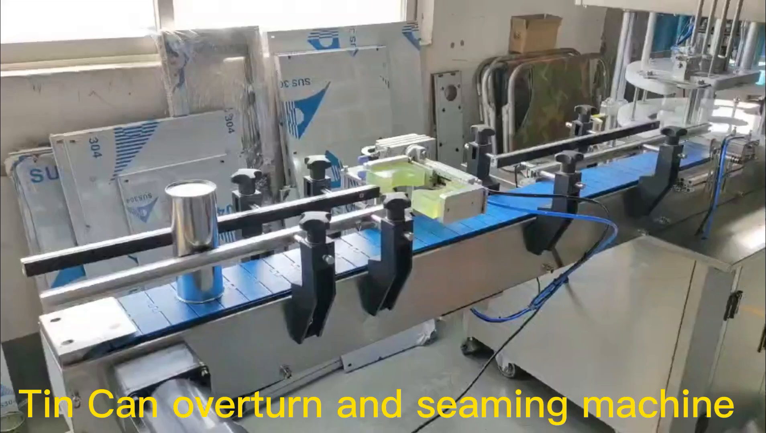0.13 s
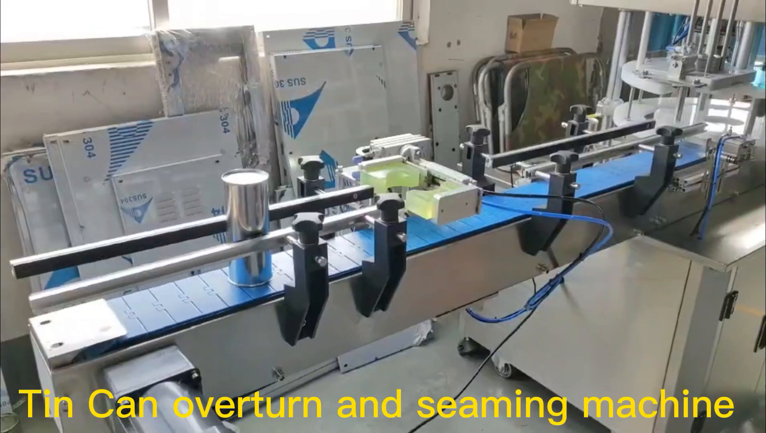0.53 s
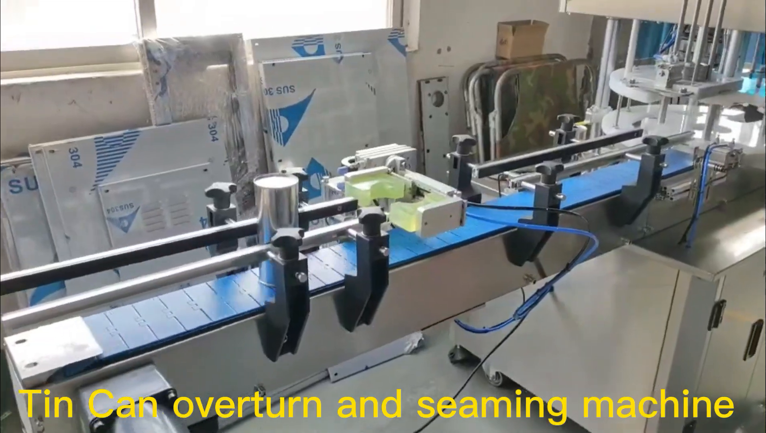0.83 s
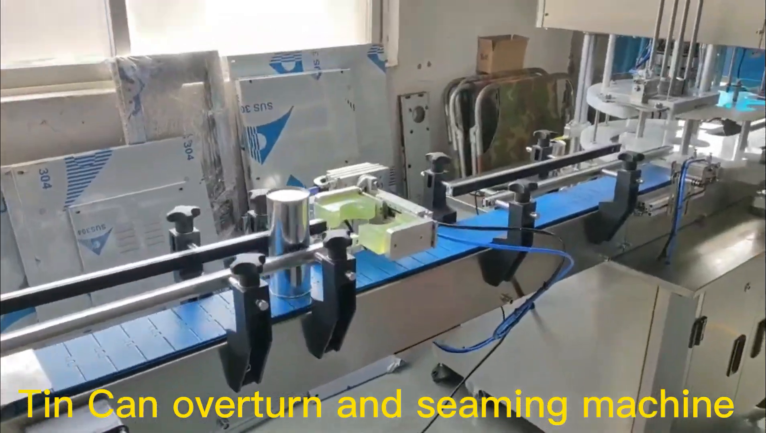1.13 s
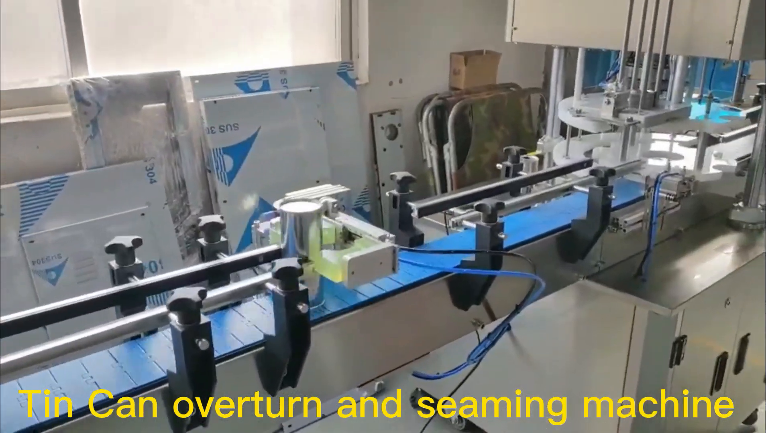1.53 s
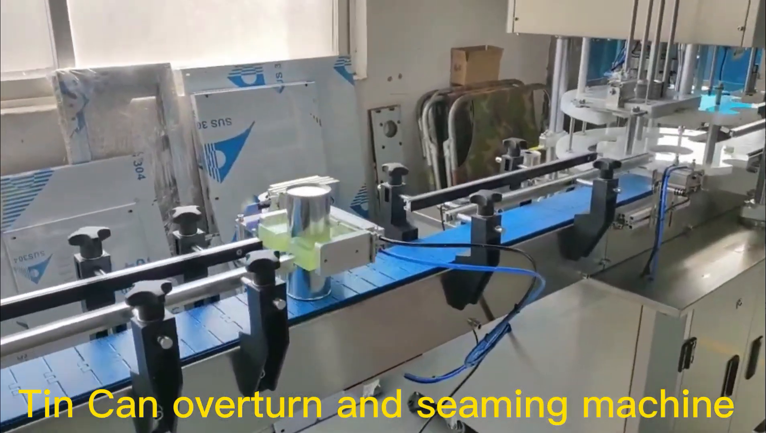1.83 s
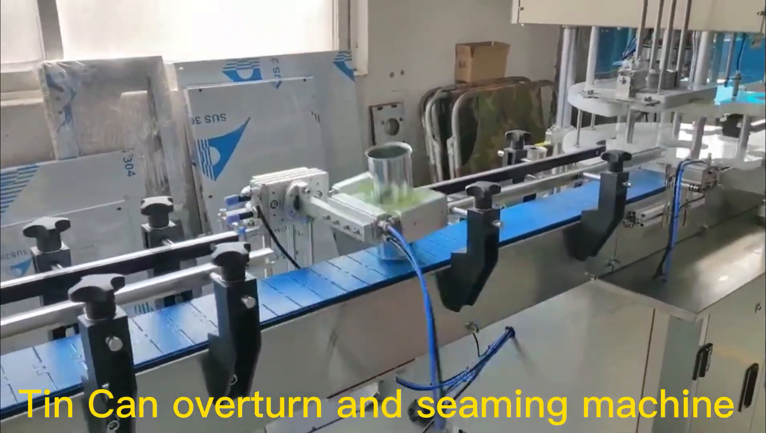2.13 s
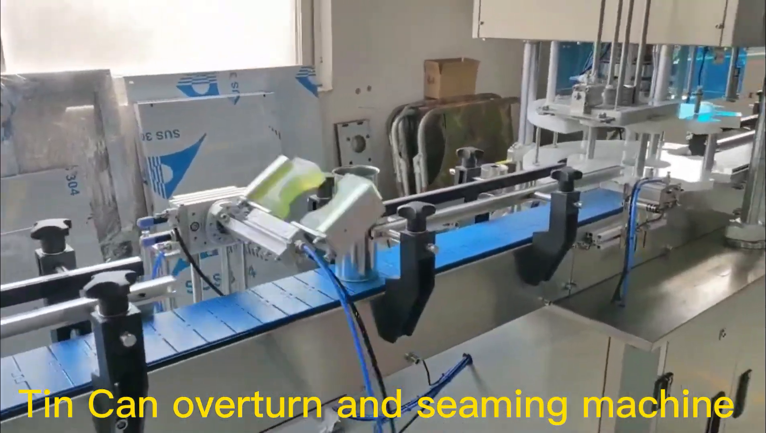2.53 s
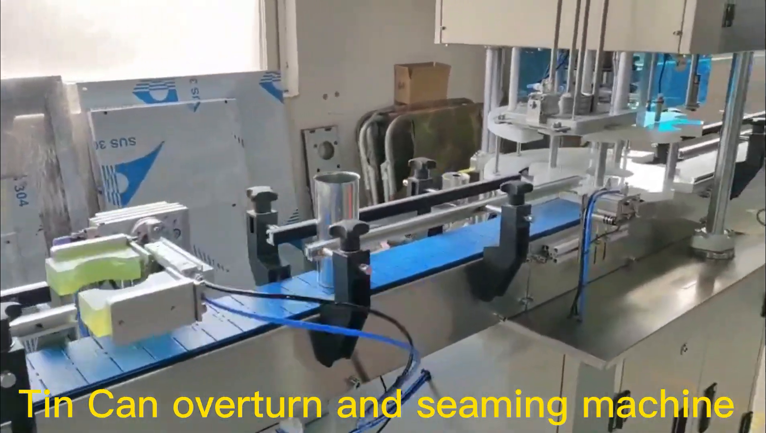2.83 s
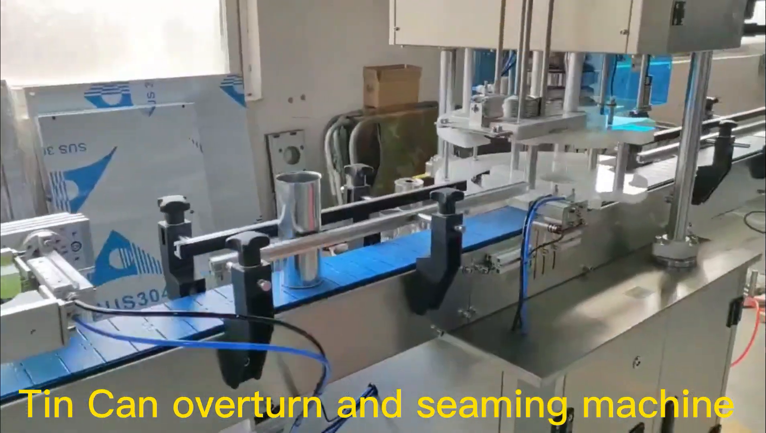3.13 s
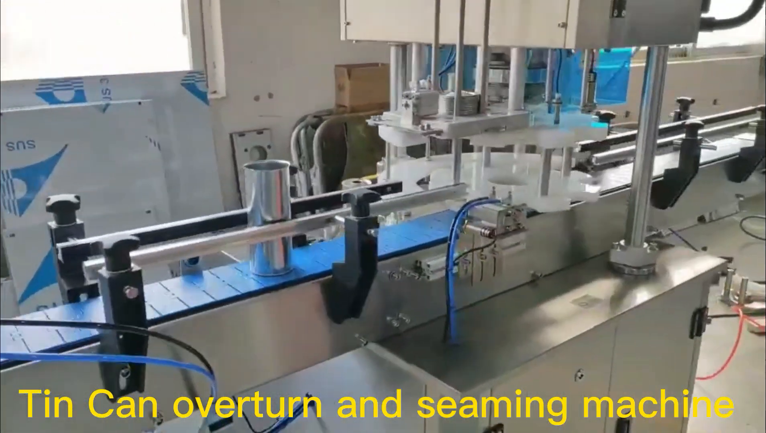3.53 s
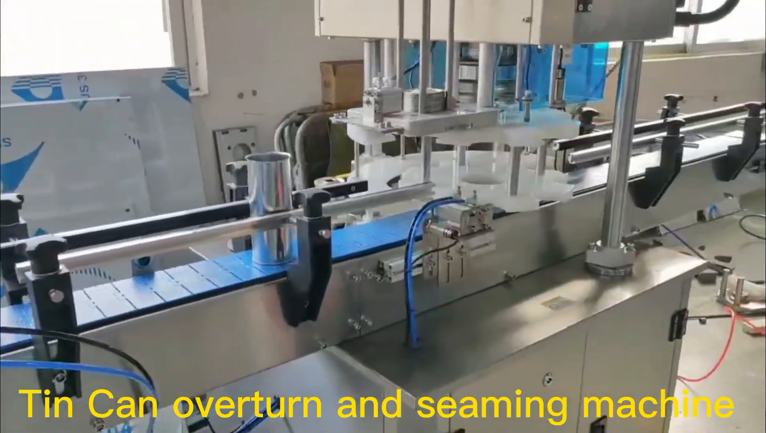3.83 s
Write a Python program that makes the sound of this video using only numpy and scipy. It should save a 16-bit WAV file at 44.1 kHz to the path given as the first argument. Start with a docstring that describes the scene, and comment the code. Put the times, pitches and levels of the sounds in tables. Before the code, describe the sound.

A conveyor whirs and drones in a workshop, with a thin electric whine and light knocks. Midway, a sliding tin can moans briefly, then an air-powered clamp clatters and gives four short hisses as the belt keeps running.

```python
"""First you hear a slat conveyor whirring and droning in a workshop as its slats slide and knock.
A thin electric whine from its drive joins in, with a few dry ticks and dull knocks of the belt.
A low moan rises as a tin can slides into an air-powered clamp. The clamp grips the can, turns it
over, lets go and swings back: its stops clatter and its valves give four short hisses of air."""
import sys
import numpy as np
from scipy import signal
from scipy.fft import rfft, irfft
from scipy.io import wavfile
from scipy.ndimage import uniform_filter1d

SR = 44100
rng = np.random.default_rng(int(sys.argv[2]) if len(sys.argv) > 2 else 0)


def store_pcm(level_fs):
    """Save levels as 16-bit WAV."""
    pcm = np.round(np.clip(level_fs, -1, 1) * 32767).astype(np.int16)
    wavfile.write(sys.argv[1], SR, np.atleast_2d(pcm).T)


N = 176400
T = np.arange(N) / SR
HZ = np.fft.rfftfreq(N, 1 / SR)


def amp(db):
    """Turns decibels into a number to multiply by."""
    return 10 ** (np.asarray(db) / 20)


def unit(x):
    """Scales a signal so its average strength (rms) is 1."""
    return x / np.sqrt(np.mean(x ** 2) + 1e-20)


def curve(rows, column=1):
    """One column of a table, joined by straight lines in time."""
    rows = np.array(rows)
    return np.interp(T, rows[:, 0], rows[:, column])


def colour(points):
    """How strong each pitch is, from rows of pitch_hz, level_db."""
    hz, db = np.transpose(points)
    return amp(np.interp(np.log(HZ + 1), np.log(hz), db))


def noise(gain):
    """Noise of strength 1 with the given colour."""
    return unit(irfft(rfft(rng.standard_normal(N)) * gain, N))


def wander(rate_hz):
    """A smooth random wobble of strength 1."""
    return noise(np.exp(-(HZ / rate_hz) ** 2))


def ripple(bins):
    """Random peaks and dips from low pitch to high; more bins make them wider."""
    return unit(uniform_filter1d(rng.standard_normal(len(HZ)), size=bins))


def phase_of(pitch_hz):
    """The angle a wave has turned through as its pitch changes."""
    return 2 * np.pi * np.cumsum(pitch_hz) / SR


# Colour of the whir, before each band gets its level: pitch_hz, level_db
WHIR_COLOUR = [(25, -46), (65, -19.5), (110, -14), (150, -2), (190, 4.5), (290, 5), (350, -9), (460, -4),
               (620, -6), (750, -9.5), (900, -6.5), (1080, -9.5), (1400, -8.5), (1650, -7.5), (2300, -6.5),
               (3000, -11), (3700, -14.5), (4600, -21), (5600, -17.5), (6500, -20.5), (7000, -24),
               (8600, -37.5), (10000, -34), (10900, -41), (11600, -26), (12000, -46)]
# Where the four bands meet: pitch_hz
BAND_EDGES = [364, 1090, 3750]
# Loudness of the bands: time_s, bass_db, body_db, rasp_db, treble_db
BAND_LEVELS = [(.14, -45.5, -50, -60, -64.5), (.32, -49.5, -49, -54.5, -61.5), (.55, -48, -41.5, -42, -53),
               (1.05, -44, -42.5, -42, -52), (1.5, -39.5, -41, -40, -46.5), (2.2, -38.5, -40.5, -40.5, -48),
               (2.75, -47, -38, -40, -46.5), (3.15, -48, -40, -41.5, -50), (3.5, -43, -39, -41, -49),
               (4, -54, -36.5, -38.5, -46.5)]

def conveyor(knocks_per_s=500, spread_db=2.5, knock_share=0.22):
    """Slats slide and knock along their guides, and the frame colours the sound."""
    hits = (rng.random(N) < knocks_per_s / SR) * rng.choice([-1, 1], N)
    hits = hits * amp(spread_db * np.minimum(rng.exponential(1, N), 4))
    t = T[:SR // 20]
    knock = rng.standard_normal(len(t)) * amp(-60 * t / 0.037)
    rattle = unit(signal.fftconvolve(hits, knock)[:N])
    slats = np.sqrt(knock_share) * rattle + np.sqrt(1 - knock_share) * rng.standard_normal(N)
    # Small patches of pitch swell and fade, and the level flickers.
    grid = signal.stft(slats, nperseg=512)[2]
    patches = uniform_filter1d(rng.standard_normal(grid.shape), size=7, axis=0)
    patches = unit(uniform_filter1d(patches, size=8, axis=1))
    slats = signal.istft(grid * amp(1.71 * patches), nperseg=512)[1][:N]
    slats = slats * amp(0.28 * wander(51))
    # A fine random ripple makes the whir's colour slightly uneven.
    ripple_db = 1.9 * ripple(bins=100) * np.minimum(HZ / 800, 1)
    rest, out = rfft(slats) * colour(WHIR_COLOUR) * amp(ripple_db), 0
    for column, edge_hz in enumerate(BAND_EDGES + [SR], start=1):
        band = rest / (1 + (HZ / edge_hz) ** 8)
        rest = rest - band
        out = out + unit(irfft(band, N)) * amp(curve(BAND_LEVELS, column))
    return out


# Low notes of the frame: pitch_hz, width_hz, level_db
DRONE_NOTES = [(188.7, 14.8, -42), (235.1, 14.6, -41.5), (319, 44, -47.5), (391, 19.5, -50),
               (437, 7.8, -52.5), (459.6, 15, -54)]
# Swell added to all those notes: time_s, boost_db
DRONE_SWELL = [(.14, -12.5), (1.1, -10), (1.75, -3), (2.0, 2.5), (2.5, 3), (2.95, 5), (3.4, 1.5), (4, 5.5)]

def drone():
    """The belt keeps the frame's low notes ringing."""
    out = 0
    for hz, width_hz, db in DRONE_NOTES:
        ring = signal.hilbert(noise(1 / (1 + ((HZ - hz) / width_hz) ** 2)))
        evened = ring.real / np.sqrt(abs(ring) + 0.84)  # softens the loudest moments
        out = out + amp(db) * unit(evened)
    return out * amp(curve(DRONE_SWELL))


# Loudness of the gear motor: time_s, level_db
MOTOR_LEVEL = [(.14, -73), (1.2, -51), (1.8, -44), (2.0, -33.5), (2.2, -41), (2.6, -50), (3.25, -36),
               (3.5, -43), (3.8, -34), (4, -48)]

def motor_hum(pitch_hz=186, waver=0.013, throbs_per_s=5.35, depth=0.28, crest_s=3.7):
    """The motor's low tone throbs as the slats pass the toothed wheel."""
    phase = phase_of(pitch_hz * (1 + waver * wander(10.8)))
    throb = 1 + depth * np.cos(2 * np.pi * throbs_per_s * (T - crest_s))
    return amp(curve(MOTOR_LEVEL)) * unit(throb * np.sin(phase))


# Two faint airy whistles, one rising and one sinking: time_s, pitch_hz, level_db
WHISTLE_UP = [(.14, 9700, -95), (.235, 9900, -77), (.258, 10500, -66), (.3, 11700, -71), (.42, 12030, -64),
              (.8, 12300, -65), (1.0, 12010, -86)]
WHISTLE_DOWN = [(.4, 8200, -85), (1.2, 7950, -74), (1.9, 7680, -64), (2.5, 7560, -71), (4, 7510, -70)]

def whistle(path, width_hz):
    """A narrow band of hiss slides in pitch and loudness."""
    phase = phase_of(curve(path))
    hiss = wander(width_hz) * np.cos(phase) + wander(width_hz) * np.sin(phase)
    return amp(curve(path, column=2)) * hiss


# Dry ticks: time_s, peak_db
TICK_TIMES = [(.245, -32), (1.6565, -13.5), (1.7893, -15.5), (2.143, -18.5), (2.3444, -12), (3.827, -23.5)]
# Colour of one tick: pitch_hz, level_db
TICK_COLOUR = [(1200, -34), (2000, -4), (3100, 2.5), (4000, -1.5), (5200, -7), (6500, -9), (7500, -24),
               (12000, -40)]

def ticks():
    """Dry clicks, each about two waves long."""
    click = irfft(colour(TICK_COLOUR), N)
    return sum(-amp(db) * np.roll(click / click[0], round(s * SR)) for s, db in TICK_TIMES)


# Drive tones, beside the clamp and further down the line: pitch_hz, near_db, far_db
WHINE_TONES = [(5518, -66, -66), (5660, -60, -64.5), (5730, -60, -65.5), (5970, -66, -67), (6110, -70, -68),
               (6277, -63, -64), (6312, -76, -66), (6347, -69, -61.5), (6385, -69, -65), (6490, -55.5, -58),
               (6560, -58, -58.5), (6662, -65, -67), (8092, -75, -73)]
# Swell added to all those tones: time_s, boost_db
WHINE_SWELL = [(.25, -24), (.55, -0.5), (1.2, 0), (1.7, 6.5), (2.3, 5.5), (3.1, 5), (4, -3.5)]

def drive_whine(walk_start_s=2.4, walk_length_s=0.42, waver_hz=2.88, flutter=0.64):
    """The motor drive sings thin, wavering tones whose mix shifts as the listener moves along."""
    out, walked = 0, np.clip((T - walk_start_s) / walk_length_s, 0, 1)
    for hz, near_db, far_db in WHINE_TONES:
        phase = phase_of(hz + waver_hz * wander(12.3))
        tone = unit(np.sin(phase) * (1 + flutter * wander(38)))
        out = out + amp(near_db + (far_db - near_db) * walked) * tone
    return out * amp(curve(WHINE_SWELL))


# Knocks of the belt: start_s, level_db
BUMP_TIMES = [(.521, -34.5), (0.642, -33), (1.362, -35), (2.775, -32), (2.889, -28.5), (3.208, -27.5),
              (3.465, -30)]
# Colour of one knock: pitch_hz, level_db
BUMP_COLOUR = [(25, -60), (80, -32), (200, -2), (450, 7.5), (900, -5), (2500, -20), (6000, -31),
               (12000, -55)]

def belt_bumps(fade_s=0.088):
    """A few dull knocks stand out of the running belt, each dropping 60 dB in fade_s."""
    level = sum((T > s) * amp(db - 60 * np.clip((T - s) / fade_s, 0, 2)) for s, db in BUMP_TIMES)
    return level * noise(colour(BUMP_COLOUR))


# Moan of the sliding can: time_s, pitch_hz, level_db
MOAN_PATH = [(1.29, 181.8, -55), (1.335, 181.4, -35), (1.365, 188.4, -44), (1.42, 192.9, -30),
             (1.5, 199, -39.5), (1.54, 213.4, -26), (1.59, 213, -33), (1.64, 247, -30.5),
             (1.678, 237.6, -35), (1.708, 240.2, -19.5), (1.735, 237, -24), (1.757, 241.5, -32),
             (1.775, 250.6, -26), (1.82, 262.7, -37.5), (1.92, 246, -32)]

def can_moan(waver=0.011, octave_db=-29, fade_s=0.023):
    """A low throbbing tone climbs as the can slides into the clamp."""
    phase = phase_of(curve(MOAN_PATH) * (1 + waver * wander(36)))
    tone = unit(np.sin(phase) + amp(octave_db) * np.sin(2 * phase))
    start_s, end_s = MOAN_PATH[0][0], MOAN_PATH[-1][0]
    gate = np.clip(np.minimum(T - start_s, end_s - T) / fade_s, 0, 1)
    return gate * amp(curve(MOAN_PATH, column=2)) * tone


def strike(t, db, rise_s, fade_s):
    """The loudness of a hit: a quick rise, dropping 60 dB in fade_s."""
    return np.minimum(t / rise_s, 1) * amp(db - 60 * np.minimum(t / fade_s, 2))


def frame_note(t, hz, db, chatter, fade_s, bend, settle_s=0.012):
    """A hollow frame note starts off pitch and settles as the chattering jaws seat."""
    pitch_hz = hz * (1 + bend * np.exp(-t / settle_s) + 0.02 * chatter)
    level = strike(t, db + 1.8 * chatter, rise_s=0.003, fade_s=fade_s)
    return level * np.sin(phase_of(pitch_hz * (t > 0)))


# The clamp hits its stops: start_s, thud_db, can_db, jaws_db, low_note_hz, low_note_db, high_note_db
STOP_HITS = [(1.774, -46, -37, -47, 487, -32, -52), (1.802, -42, -43, -47, 496, -48, -35),
             (1.933, -28, -25.5, -48, 487, -25.5, -29.5), (1.968, -26, -32, -32.5, 486, -45, -52),
             (2.338, -35, -36, -52, 490, -28, -31), (2.359, -36, -36, -43, 491, -25, -50),
             (2.438, -38, -24.5, -30, 493.5, -24, -20.5), (2.446, -33, -22.5, -31, 474, -40, -49),
             (2.476, -36, -28, -50, 464, -23, -47), (2.5006, -31, -29.5, -21, 462, -26, -45),
             (2.521, -30, -27, -49, 451, -23, -31), (2.603, -46, -27, -42, 473, -42, -50)]
# Colours of the thud, the ringing can and the clashing jaws: pitch_hz, level_db
THUD_COLOUR = [(30, -45), (100, -26), (300, -13), (400, -19), (500, 4), (700, 15), (790, -12), (850, -18),
               (1400, -22), (3000, -43)]
CAN_COLOUR = [(60, -50), (900, -5), (1600, -8.5), (2050, -1.5), (2350, -1), (2620, -3), (2780, 1.5),
              (3000, 4), (3300, -9), (3750, -1), (4200, -11), (7000, -52)]
JAWS_COLOUR = [(60, -50), (1800, -12), (3200, -2.5), (4000, -3.5), (5000, -5), (6700, -3.5), (7400, -16),
               (8200, -28), (12000, -29)]

def clamp_clacks(high_hz=750, thud_fade_s=0.041, can_fade_s=0.097, jaws_fade_s=0.095):
    """Each hit thuds and rings the can, the metal jaws and two notes of the hollow frame."""
    out, chatter = 0, wander(80)
    for start_s, thud_db, can_db, jaws_db, low_hz, low_db, high_db in STOP_HITS:
        t = np.maximum(T - start_s, 0)
        for db, part, fade_s in [(thud_db, THUD_COLOUR, thud_fade_s),
                                 (can_db, CAN_COLOUR, can_fade_s),
                                 (jaws_db, JAWS_COLOUR, jaws_fade_s)]:
            out = out + strike(t, db, rise_s=0.0017, fade_s=fade_s) * noise(colour(part))
        out = out + frame_note(t, low_hz, low_db, chatter, fade_s=0.12, bend=0.059)
        out = out + frame_note(t, high_hz, high_db, chatter, fade_s=0.16, bend=-0.09)
    return out


# Valves let out air: start_s, rise_s, hold_s, jet_db, port_hz, spurt_db, spurt_delay_s
VALVE_BLOWS = [(1.799, .012, 0.003, -24, 6400, -35, .012), (1.903, 0.011, 0.0072, -25.5, 6150, -35.5, .031),
               (2.395, 0.027, 0.006, -27, 6150, -42, .024), (2.548, 0.013, 0.016, -28.5, 5900, -39, .022)]
# Colours of the air jet and its thin spurt: pitch_hz, level_db
JET_COLOUR = [(30, -28), (100, -2), (300, 8), (700, 6.5), (1400, -2), (2200, 5), (3000, 8), (4500, 1),
              (5500, 3.5), (7000, 0.5), (7800, -2.5), (9000, -17), (12000, -14)]
SPURT_COLOUR = [(6000, -28), (8000, -18), (9500, 3.5), (10700, -3), (11450, 3), (12100, -4)]

def valve_hisses(fade_s=0.23, port_width_hz=530, spurt_rise_s=0.007, spurt_fall_s=0.02):
    """Each valve spits a thin spurt and blows a jet through its port, fading as the cylinder empties."""
    out = 0
    for start_s, rise_s, hold_s, jet_db, port_hz, spurt_db, delay_s in VALVE_BLOWS:
        t = T - start_s
        level = np.clip(t / rise_s, 0, 1) * amp(-60 * np.maximum(t - rise_s - hold_s, 0) / fade_s)
        port_db = 11 * np.exp(-((HZ - port_hz) / port_width_hz) ** 2 / 2)  # the opening rings
        ripple_db = 2.5 * ripple(bins=700)
        jet = amp(jet_db) * level * noise(colour(JET_COLOUR) * amp(port_db + ripple_db))
        burst = np.exp(-np.maximum((delay_s - t) / spurt_rise_s, (t - delay_s) / spurt_fall_s))
        spurt = amp(spurt_db) * burst * noise(colour(SPURT_COLOUR) * amp(ripple_db))
        sputter_db = wander(330)
        out = out + jet * unit(amp(sputter_db)) + spurt * unit(amp(2 * sputter_db))
    return out


def valve_puffs(pitch_hz=83, level_db=-43.5, width_s=0.007):
    """A soft, low push of air comes as each valve opens."""
    out = 0
    for start_s, rise_s, *_ in VALVE_BLOWS:
        t = T - start_s - rise_s
        out = out + np.exp(-(t / width_s) ** 2 / 2) * np.sin(2 * np.pi * pitch_hz * t)
    return amp(level_db) * out


def workshop_echo(sound, echoes_per_s=2000, fade_s=0.36, level_db=-10):
    """Sound bounces around the room as scattered echoes that die away."""
    t = T[:SR]
    echoes = rng.standard_normal(SR) * (rng.random(SR) < echoes_per_s / SR)
    echoes = echoes * (t > 0.006) * amp(-60 * t / fade_s)
    return amp(level_db) * signal.fftconvolve(sound, echoes / np.linalg.norm(echoes))[:N]


def scene():
    """The conveyor runs while the clamp works; only the clamp echoes."""
    whistles = whistle(WHISTLE_UP, width_hz=260) + whistle(WHISTLE_DOWN, width_hz=36)
    machine = conveyor() + belt_bumps() + drone() + motor_hum()
    machine = machine + can_moan() + drive_whine() + whistles + ticks()
    clamp = valve_hisses() + valve_puffs() + clamp_clacks()
    return (machine + clamp + workshop_echo(clamp))[None]


def record(dry):
    """The sound cuts in after a moment of silence, with its highest treble removed."""
    start_s, rise_s, top_hz = 0.1313, 0.01, 12150
    opened = dry * np.clip((T - start_s) / rise_s, 0, 1)
    treble_cut = signal.firwin(511, top_hz, window=("kaiser", 9), fs=SR)
    return signal.oaconvolve(opened, treble_cut[None], "same")


dry = scene()
out = record(dry)
store_pcm(out)
```